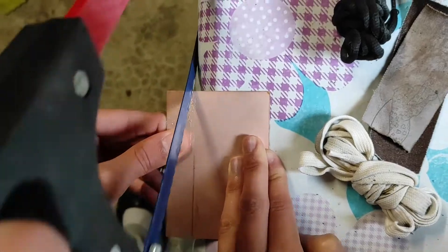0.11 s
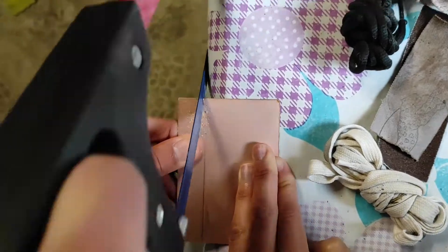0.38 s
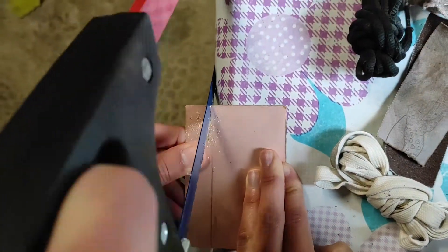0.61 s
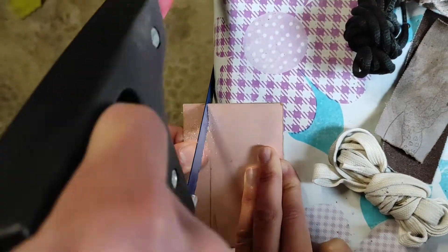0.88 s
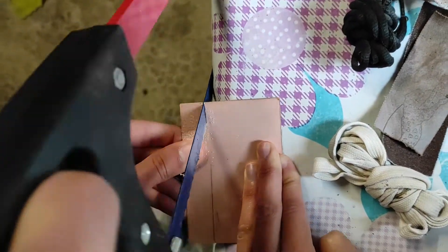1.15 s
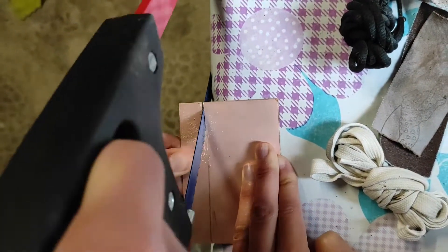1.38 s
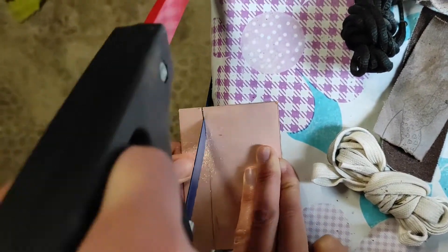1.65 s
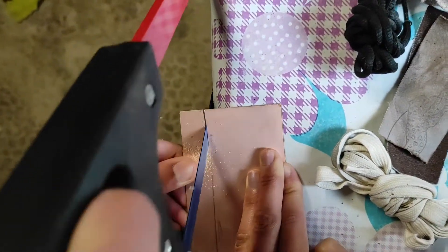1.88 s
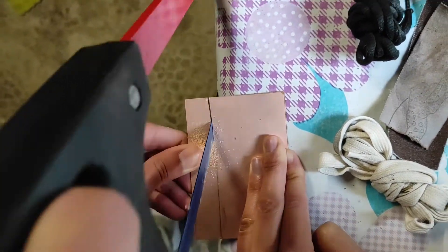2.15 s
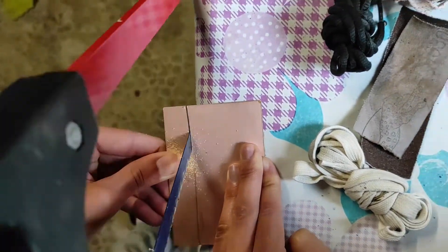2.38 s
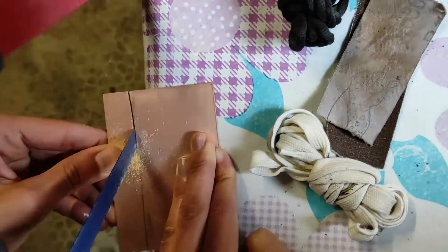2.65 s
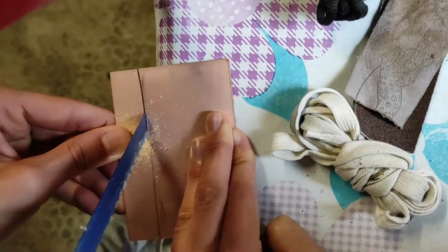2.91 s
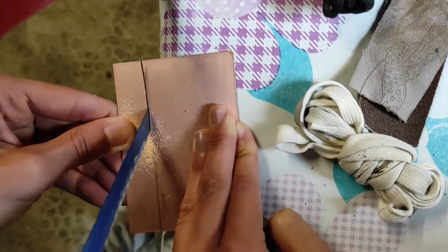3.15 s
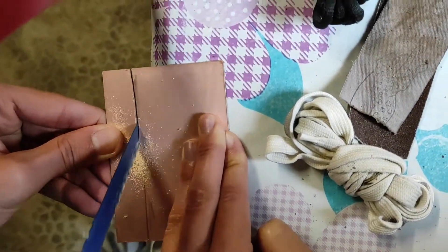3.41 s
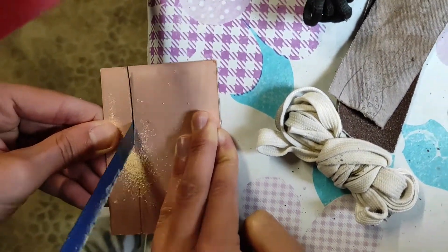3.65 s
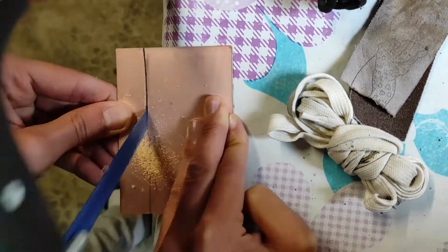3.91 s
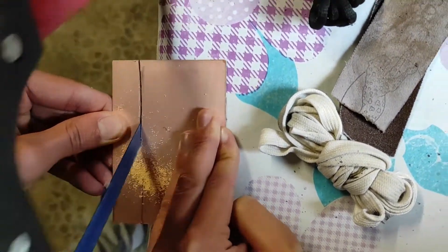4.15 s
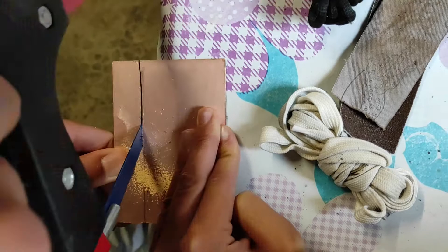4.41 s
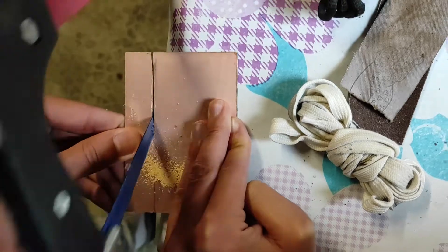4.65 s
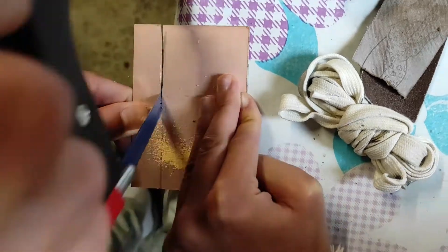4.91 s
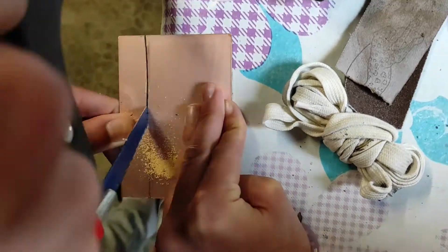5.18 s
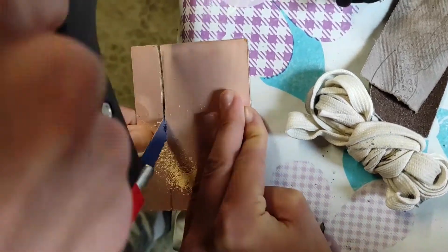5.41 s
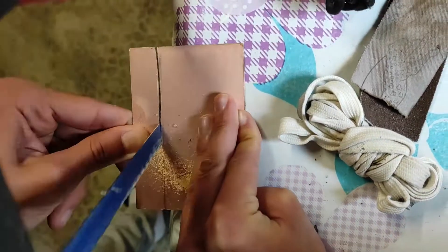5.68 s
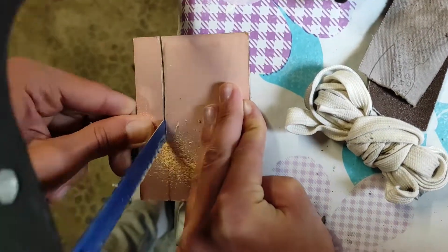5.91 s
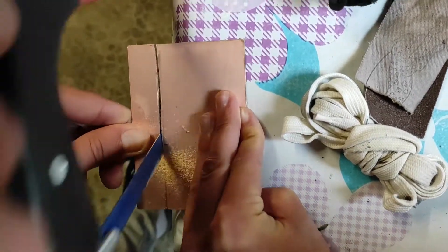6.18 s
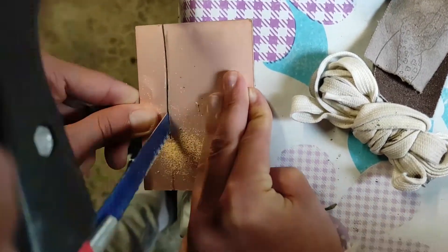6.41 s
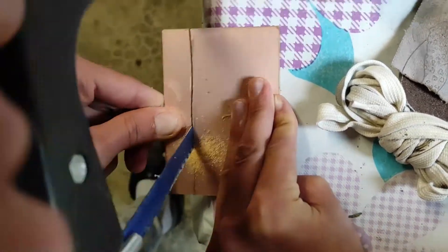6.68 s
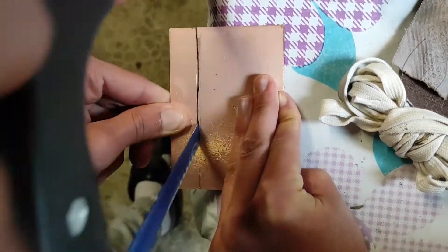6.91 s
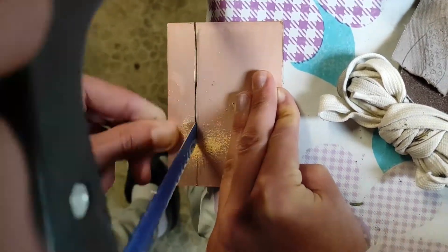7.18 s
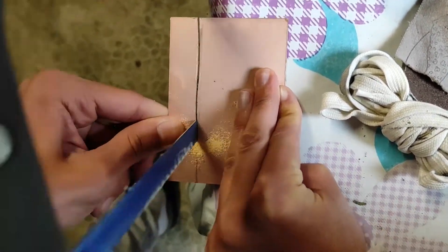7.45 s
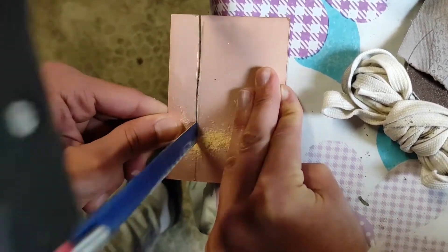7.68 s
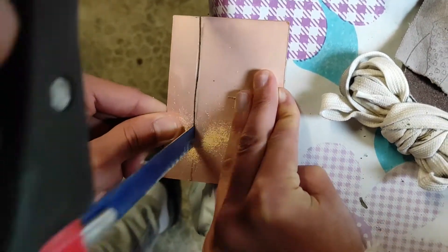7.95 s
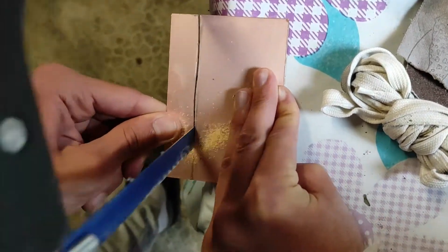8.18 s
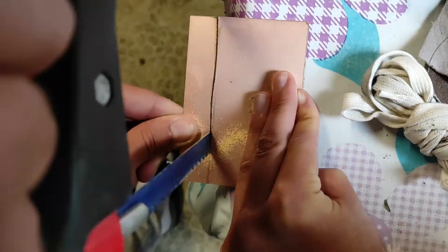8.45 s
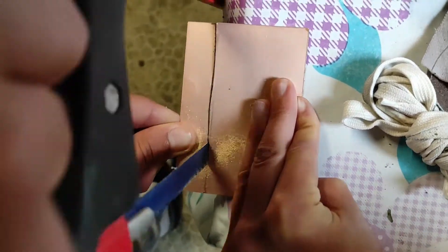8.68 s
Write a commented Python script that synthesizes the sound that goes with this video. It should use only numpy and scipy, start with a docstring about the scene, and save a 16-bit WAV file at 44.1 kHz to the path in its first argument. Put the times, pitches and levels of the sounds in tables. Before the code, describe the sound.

Very close, sped-up sawing with a fine-toothed hacksaw blade along a groove in a thin copper-clad board. Dozens of tiny strokes chirp up and down, ringing the board, with gritty hiss on top and dull thuds from a padded bench. Light at first, it swells brighter midway, breaks into pauses over a faint hum, then returns louder and harder. Dry small room, stereo microphone nearby, stronger on the left.

```python
"""Sped-up strokes of a fine-toothed saw blade, heard as a fast to and fro along a groove in a thin
copper-clad board, close to a two-port microphone. They start lightly: the teeth chirp up and down with the
blade speed and ring board and blade, gritty hiss rides on top, and the padded bench thuds faintly. Past 3 s
the tooth tone and the rings swell for a while. From about 4.3 s longer pauses bare the steady low hum and a
whine that sinks in pitch until 5.4 s. Then come louder, harder strokes up to the end."""
import sys
import numpy as np
from scipy import signal
from scipy.fft import rfft, irfft, next_fast_len
from scipy.io import wavfile
from scipy.ndimage import uniform_filter1d, minimum_filter1d

SR = 44100
rng = np.random.default_rng(int(sys.argv[2]) if len(sys.argv) > 2 else 0)


def elevation(decibels):
    """Turn decibel levels (scalar or array-like) into linear amplitude ratios."""
    levels = np.asarray(decibels, float)
    return 10 ** (levels / 20)


def to_wav(s):
    """Save 16-bit WAV."""
    ch = np.atleast_2d(s).T  # columns
    pcm = np.round(np.clip(ch, -1, 1) * 32767)  # PCM
    wavfile.write(sys.argv[1], SR, pcm.astype(np.int16))


N = 388962  # samples, 8.82 s

# Even runs of strokes, push and pull in turn, a push first: first_s, last_s, strokes (count)
STROKE_RUNS = [(0.031, 0.053, 2), (0.079, 0.205, 6), (0.238, 0.366, 6), (0.396, 0.643, 10),
               (0.675, 0.829, 7), (0.903, 1.11, 8), (1.143, 1.157, 2), (1.178, 1.222, 3), (1.251, 1.283, 2),
               (1.308, 1.366, 3), (1.465, 1.599, 6), (1.628, 1.869, 10), (1.899, 2.044, 6),
               (2.078, 2.106, 2), (2.134, 2.158, 2), (2.19, 2.641, 16), (2.671, 2.807, 6), (2.836, 2.92, 4),
               (2.941, 3.032, 4), (3.058, 3.218, 8), (3.239, 3.313, 4), (3.34, 3.486, 7), (3.644, 3.693, 3),
               (3.721, 4.296, 23), (4.323, 4.343, 2), (4.45, 4.471, 2), (4.64, 4.715, 4), (4.797, 4.882, 4),
               (4.901, 5.061, 7), (5.384, 5.466, 4), (5.49, 5.668, 8), (5.692, 5.902, 10),
               (5.921, 5.949, 2), (5.975, 6.132, 8), (6.153, 6.346, 10), (6.486, 6.699, 10),
               (6.718, 6.734, 2), (6.761, 6.956, 10), (6.973, 7.153, 9), (7.365, 7.471, 6),
               (7.489, 7.839, 16), (7.874, 8.039, 8), (8.063, 8.094, 2), (8.175, 8.243, 4),
               (8.279, 8.373, 4), (8.394, 8.473, 5), (8.498, 8.528, 2), (8.549, 8.572, 2),
               (8.588, 8.687, 6), (8.71, 8.796, 5)]
# How hard each run bears down: teeth_push_db, teeth_pull_db, grit_push_db, grit_pull_db,
# tooth_rate_hz (teeth per second at full speed, before chance)
RUN_FORCES = [(-39, -37.5, -43, -37.5, 1830), (-37.5, -49, -43, -47.5, 1870),
              (-35.5, -44, -40.5, -44.5, 2050), (-33.5, -43.5, -39, -44.5, 2500),
              (-34, -48.5, -40, -47.5, 1870), (-32, -41, -37, -45, 2600), (-36.5, -57, -36.5, -54, 2350),
              (-41, -50, -45, -57, 2560), (-36, -37.5, -35, -42.5, 2350), (-31, -39.5, -37.5, -48, 2970),
              (-35.5, -36.5, -39.5, -38, 2130), (-35, -38.5, -39, -44.5, 2330),
              (-34, -44.5, -40.5, -48, 2220), (-31.5, -35.5, -39, -40.5, 3140),
              (-33.5, -40, -39, -48, 2800), (-32.5, -40, -37, -44.5, 2570),
              (-33.5, -44.5, -41, -51.5, 1890), (-33, -41.5, -40, -44, 2120), (-32, -41, -36.5, -42, 2190),
              (-31, -38, -37.5, -40, 2600), (-34.5, -41.5, -42, -44.5, 1960),
              (-29, -40.5, -40.5, -36, 2730), (-31, -39, -33.5, -35.5, 3580), (-31, -33, -32, -33, 3250),
              (-31, -35.5, -30.5, -41, 3210), (-34.5, -35.5, -40, -38, 2950),
              (-38.5, -40, -34.5, -34, 2770), (-30, -37, -33, -36, 2730), (-29.5, -40.5, -26.5, -28, 2380),
              (-30, -42.5, -24.5, -35.5, 2230), (-28, -36.5, -30, -28.5, 2590), (-26, -35, -31, -33, 3230),
              (-31.5, -45, -38.5, -61, 1810), (-28, -31.5, -31.5, -36.5, 3070),
              (-22.5, -31.5, -36.5, -38.5, 3100), (-28, -36.5, -31.5, -37.5, 2820),
              (-32.5, -38.5, -34, -41, 1700), (-24, -37, -34.5, -32.5, 2610),
              (-25.5, -33.5, -39, -37, 2580), (-32, -36.5, -32, -28, 2730), (-29, -35.5, -30.5, -30, 2450),
              (-29, -33, -30.5, -30.5, 2750), (-29.0, -31.5, -31, -34.5, 2350),
              (-23.5, -32, -32, -32.5, 2800), (-28, -32, -35, -33.5, 3000), (-26, -33.5, -33, -34, 2690),
              (-40, -47, -39.5, -40, 1700), (-29, -32, -33.5, -40, 2400), (-26, -32.5, -34, -33, 2650),
              (-23, -34, -34, -28, 3000)]
# Single saw strokes outside the even runs, weak and strong: middle_s, teeth_db, grit_db,
# tooth_rate_hz (before chance)
LONE_STROKES = [(0.873, -45.5, -44, 1920), (3.591, -46.5, -47, 1510), (3.618, -44.5, -37.5, 1830),
                (4.609, -42, -45.5, 2400), (5.095, -31, -23, 2910), (5.237, -63, -48, 2580),
                (5.306, -40.5, -29, 1300), (5.352, -48, -33, 1750), (6.372, -30, -33, 2600),
                (6.45, -42, -43, 1300), (7.342, -35.5, -33, 1900), (8.141, -34.5, -37, 2000)]
# Strokes that bite hard, each with its own force and speed: middle_s, teeth_db, tooth_rate_hz
HARD_BITES = [(0.4503, -31.5, 2390.0), (0.561, -29, 2820.0), (0.6164, -31, 2280.0), (0.7824, -34.5, 1850.0),
              (0.8996, -32.5, 1920.0), (1.0821, -30, 2260.0), (1.141, -33, 2330.0), (1.2484, -33, 2350.0),
              (1.4901, -32.5, 2800.0), (1.6255, -33, 2540.0), (1.6822, -33, 2300.0), (1.7336, -31, 2390.0),
              (1.788, -30.5, 2260.0), (1.8384, -32, 1980.0), (1.898, -35, 1660.0), (1.9578, -31.2, 2220.0),
              (2.016, -29.5, 2220.0), (2.0799, -31.5, 2780.0), (2.136, -33, 2350.0), (2.1932, -29, 2260.0),
              (2.254, -29, 2840.0), (2.3086, -30, 2000.0), (2.3702, -26.5, 2910.0), (2.4303, -28.5, 2090.0),
              (2.492, -29.5, 3420.0), (2.549, -30, 3270.0), (2.6152, -32.5, 2050.0), (2.6739, -35, 1610.0),
              (2.7268, -29.5, 1850.0), (2.7813, -31, 2240.0), (2.8354, -33.5, 1850.0),
              (3.0026, -35.5, 1980.0), (3.057, -31, 3340.0), (3.1048, -32.5, 2260.0),
              (3.2387, -32.5, 1940.0), (3.2864, -35, 1940.0), (3.4364, -30.5, 2840.0),
              (3.4863, -29.5, 3290.0), (3.642, -33, 3700.0), (3.7002, -32, 3360.0), (3.726, -33, 3400.0),
              (3.7489, -28, 3400.0), (3.7748, -29.5, 3270.0), (3.7989, -33.5, 3490.0), (3.849, -30, 3420.0),
              (3.9313, -30, 3270.0), (3.9548, -30.5, 3360.0), (3.9834, -30.5, 3210.0), (4.008, -29, 3320.0),
              (4.065, -30, 3270.0), (4.092, -28, 3190.0), (4.1416, -26.5, 3230.0), (4.1662, -34.5, 1940.0),
              (4.188, -33, 2760.0), (4.2188, -33.5, 2350.0), (4.2738, -31, 3250.0), (4.2969, -33, 3190.0),
              (4.4507, -36, 1810.0), (4.4728, -38.5, 1920.0), (4.6643, -33.5, 2430.0),
              (4.6922, -31, 3080.0), (4.793, -34.5, 2280.0), (4.8286, -37.5, 2330.0),
              (5.0095, -29.5, 2430.0), (5.035, -34.5, 2480.0), (5.0659, -33.5, 1960.0),
              (5.3852, -33, 1960.0), (5.488, -28, 2330.0), (5.54, -26, 2540.0), (5.5912, -26, 2580.0),
              (5.741, -25.5, 3190.0), (5.7877, -27, 2450.0), (5.9217, -33, 1270.0), (6.0222, -29.5, 2560.0),
              (6.0595, -30, 2430.0), (6.1997, -28, 2240.0), (6.2363, -26.5, 2170.0), (6.2788, -27, 2280.0),
              (6.3254, -24, 3170.0), (6.4854, -27.5, 1890.0), (6.531, -28, 2280.0), (6.5823, -27.5, 3750.0),
              (6.6278, -27, 1920.0), (6.6741, -31.5, 2000.0), (6.718, -27.5, 1850.0),
              (6.8062, -25.5, 2730.0), (6.8257, -28.5, 3080.0), (6.8472, -29, 2170.0),
              (6.8885, -24, 2730.0), (6.9176, -29, 3140.0), (6.9345, -26.5, 2200.0),
              (6.9751, -26.5, 2580.0), (7.0179, -27.5, 2050.0), (7.061, -25, 2840.0), (7.1057, -27, 2690.0),
              (7.1572, -29, 2280.0), (7.409, -25.5, 3210.0), (7.4526, -29.5, 1920.0), (7.4915, -29, 1660.0),
              (7.538, -25.5, 1980.0), (7.5821, -24, 2710.0), (7.632, -26, 1570.0), (7.6758, -31, 1870.0),
              (7.7182, -27.5, 2540.0), (7.7702, -24, 2630.0), (7.8184, -27, 2240.0),
              (7.9253, -29.5, 1980.0), (7.9709, -31.5, 1920.0), (8.0143, -27.5, 2280.0),
              (8.0616, -27, 2330.0), (8.0953, -33, 1550.0), (8.1782, -27, 2130.0), (8.2213, -25, 2480.0),
              (8.2769, -32.5, 2520.0), (8.3483, -31.5, 1980.0), (8.3943, -26, 2500.0),
              (8.4352, -27.7, 1940.0), (8.4712, -28, 1960.0), (8.5911, -33, 1570.0), (8.6657, -25, 2630.0),
              (8.7972, -33, 1640.0)]
# Resonances of board and blade: pitch_hz, width_hz, peak_db
RESONANCES = [(910, 49, 7), (1133, 68, 4), (1330, 45, 3), (1552, 43, 5.5), (1880, 92, 4), (2299, 82, 1),
              (3163, 47, 3.5), (5150, 140, 4.5), (7860, 180, 3), (8820, 250, 1)]
# Dead spots between the resonances: pitch_hz, width_hz, depth_db
DEAD_SPOTS = [(1225, 46, 8), (1438, 44, 9), (1793, 60, 9), (3650, 680, 10.5)]
# Broad colour of the board: pitch_hz, level_db
BOARD_COLOUR = [(300, -33.5), (560, -6), (800, 4), (1200, -2), (2000, 0), (3300, 0), (3900, -2.5),
                (6000, -21)]
# Colour of the grit as the free blade length changes: start_s, board_side_db, blade_ring_db, fizz_db
GRIT_COLOURS = [(0, -5, -6, -1), (3.3, 1, 3.5, 5.5), (3.7, -7.5, 3, 1.5), (4.3, -10.5, -4, -4),
                (4.8, -12, -10.5, -7), (5.599, -18, -12.5, -8), (6.099, -8, -5, 3.5), (6.5, -13, -7.5, -6),
                (7.2, -12, -2, -2), (7.5, -5, -7, -8.5), (8.8, -5.5, -3.5, -3.5)]
# Borders of those three grit bands: pitch_hz
GRIT_BORDERS = (4240, 6040, 9420, 15200)
# The bare tooth tone against the teeth, before its changes from stroke to stroke: start_s, level_db
TOOTH_TONE_LEVEL = [(0, -0.5), (2.2, 2.5), (3.3, 8), (3.7, 2.5), (4.3, -1), (4.8, -7), (6, -0.5),
                    (7.2, 2.5)]
# Rings that come and go as the cut moves along the board: width_hz (of each smoothing), pitch_hz;
# the first has no fixed pitch but glides
BOARD_RINGS = [(380,), (910, 4737), (670, 7265), (1190, 14800)]
# Pitch of the gliding ring: start_s, pitch_hz
RING_GLIDE = [(3.62, 3500), (3.9, 3310), (4.15, 3207)]
# Each ring against the grit, before chance: start_s, then one level_db per ring
RING_LEVELS = [(0, -19, -24, -5, -20), (2.2, -15, -23, -7.5, -25), (3.3, -9, 0, -18, -6),
               (3.7, -2, -23, -10, 1), (4.3, -6.5, -31, -4, -5.5), (4.8, -10.5, -27, -5, -19),
               (5.5, -21, -20, -4, -8), (6.1, -4.5, -25, -3, 3), (6.5, -6, -32, -10, -5.5),
               (7.2, -16, -13, -23, -6), (7.5, -25, -4, -12, -6), (8.8, -7, -3.5, -12, -7)]
# Colour of the padded bench: pitch_hz, level_db
BENCH_COLOUR = [(60, -24), (150, -16), (300, 0), (430, -6.5), (600, -21)]
# Small touches of the blade in the pauses: start_s, level_db, pitch_hz
BLADE_TOUCHES = [(1.432, -43, 1880), (3.525, -41, 1573), (4.39, -44.5, 1178), (5.121, -45, 5010),
                 (5.233, -49, 6040), (5.283, -58, 2460), (7.215, -55, 7045), (7.238, -59, 3650),
                 (7.248, -55, 3650), (7.276, -41.5, 1396)]
# Stuck teeth breaking loose as a stroke starts: start_s, level_db (before colouring)
TOOTH_SNAPS = [(1.1767, -18), (2.0707, -14.5), (2.5775, -24), (3.5867, -27), (4.4448, -27), (4.4644, -29),
               (4.6034, -22), (4.6564, -27), (5.234, -21.5), (5.2999, -18.5), (5.3467, -22), (5.3704, -20),
               (8.089, -15.5), (8.1334, -22), (8.2674, -26)]
# Colour of the low hum: pitch_hz, level_db
HUM_COLOUR = [(22, -13), (70, -3.5), (250, -3.5), (400, 2), (480, 2), (580, -31), (740, -15), (1100, -14.5),
              (3580, -21.5), (12000, -25), (16000, -25)]
# The falling whine: start_s, pitch_hz, level_db
WHINE_PATH = [(3.9, 426, -84), (4.401, 398.6, -56.5), (4.75, 386, -64), (5.15, 331, -65), (5.4, 327.4, -76)]
# Microphone ports: pitch_hz, likeness (0-1), left_over_right_db, left_lead_radians
MIC_PORTS = [(50, 0.88, 4.5, 0.9), (302, 1, 10, 0), (1190, 0.85, 10.5, 0.5), (1460, 0.79, 4, -0.04),
             (2140, 0.88, 11.5, -1.2), (3250, 0.78, 7, 1.44), (4920, 0.44, 4, -1.5), (7000, 0.58, 3, -1.5),
             (9200, 0.46, 2, -2.5), (15100, 0.38, 0, -2)]

RISE_S, FALL_S = 0.0095, 0.0155  # longest speed-up and slow-down of a stroke that does not bite
BITE_RISE_S, BITE_FALL_S = 0.008, 0.012  # the same for a stroke that bites
DRAG = 0.13  # the blade keeps scraping faintly while it turns round


def saw():
    """Moves the blade and adds up all it drives: teeth, grit, tooth tone, rings and bench."""
    rows = strokes()
    bites = rows[:, 4] > 0
    rise_s = np.where(bites, BITE_RISE_S, RISE_S)
    fall_s = np.where(bites, BITE_FALL_S, FALL_S)
    speed, stroke = motion(rows[:, 0], rise_s, fall_s)
    # 1 while the blade moves, also across short turns (under 900 samples)
    moving = minimum_filter1d(-minimum_filter1d(-np.sign(speed.round(decimals=3)), size=900), size=901)
    _, teeth_db, grit_db, teeth_hz, bite = rows[stroke].T

    # the teeth catch and let go within a stroke
    catch_db = 1.8 * evened(uniform_filter1d(rng.standard_normal(N), size=160))
    teeth_db = teeth_db + 0.28 * stroke_luck(stroke) + catch_db
    grit_db = grit_db + catch_db

    turns, clicks = tooth_clicks(speed, teeth_hz)
    # noise with heavy tails: a few crumbs are much larger than most
    crumbs = rng.standard_normal((6, N)) * elevation(3.64 * rng.standard_normal(N))
    sound = teeth_on_board(clicks, crumbs[0], teeth_db, speed, moving)
    sound += grit_hiss(turns, clicks, crumbs[1:4], grit_db, speed, moving, stroke)
    sound += tooth_tone(turns, teeth_db, speed, stroke, bite)
    sound += board_rings(crumbs[5], grit_db, speed, moving, stroke)
    return sound + bench_thud(crumbs[4], teeth_db, grit_db, speed)


def strokes():
    """Lists strokes as middle_s, teeth_db, grit_db, tooth_rate_hz, bite (0 or 1); bites take over their strokes."""
    rows = list(LONE_STROKES)
    for (first, last, count), force in zip(STROKE_RUNS, RUN_FORCES):
        push, pull, grit_push, grit_pull, hz = force
        for k, s in enumerate(np.linspace(first, last, count)):
            if k % 2:
                rows.append((s, pull, grit_pull, hz))
            else:
                rows.append((s, push, grit_push, hz))
    rows = np.array([(*row, 0) for row in sorted(rows)])
    rows[:, 3] *= np.exp(0.08 * rng.standard_normal(len(rows)))  # uneven tooth rate
    even = rows[:, 0].copy()
    for s, db, hz in HARD_BITES:
        k = np.argmin(abs(even - s))
        rows[k] = s, db, rows[k, 2], hz, 1
    return rows


def motion(middle, rise_s, fall_s):
    """Blade speed 0-1, a half sine between turning points, and the index of the stroke under way."""
    # a speed-up takes at most 48 % of the gap between two middles
    rise = np.minimum(np.diff(middle, prepend=0) * 0.48, rise_s)
    for s, _ in TOOTH_SNAPS:  # a stuck blade waits for its snap
        k = np.searchsorted(middle, s)
        rise[k] = min(rise[k], middle[k] - s)
    begin = middle - rise
    end = np.minimum(middle + fall_s, np.append(begin[1:], 99))
    knots = np.stack([begin + 1e-5, middle, end], 1).ravel()
    places = (np.arange(len(middle))[:, None] + [0, 0.5, 1]).ravel()
    place = np.interp(np.arange(N) / SR, knots, places)
    return np.abs(np.sin(np.pi * place)), np.minimum(place.astype(int), len(middle) - 1)


def stroke_luck(stroke):
    """One chance value per stroke, held while that stroke lasts."""
    return rng.standard_normal(stroke.max() + 1)[stroke]


def tooth_clicks(speed, hz):
    """One click per tooth, unevenly spaced and sized, faster at mid-stroke; also counts the teeth."""
    wobble = 1 + 0.1 * evened(uniform_filter1d(rng.standard_normal(N), size=24))
    turns = np.cumsum(hz * speed ** 0.65 * wobble) / SR
    size = 1 + 0.3 * rng.standard_normal(int(N / 4))[turns.astype(int)]
    # four harmonics add up to a pulse halfway through each turn
    return turns, size * sum(np.cos(2 * np.pi * k * (turns - 0.5)) for k in range(1, 5))


def teeth_on_board(clicks, crumbs, teeth_db, speed, moving):
    """Clicks, roughness and stray chips strike the board, which rings at its resonances."""
    def board_db(hz):
        return read(BOARD_COLOUR, hz) + modes_db(hz)

    teeth = 0.9 * evened(clicks) + 0.4 * evened(crumbs)
    rasp = teeth * elevation(teeth_db - 3.5) * (speed ** 1.47 + DRAG * moving)
    # stray chips crack off between the teeth, on average 300 a second
    chips = (rng.random(N) < 300 / SR) * rng.standard_normal(N)
    rasp += evened(chips) * elevation(uniform_filter1d(teeth_db, size=1500) - 13) * moving
    return coloured(rasp, board_db) / np.std(coloured(crumbs, board_db))


def grit_hiss(turns, clicks, crumbs, grit_db, speed, moving, stroke):
    """Crumbling grit pulses with the teeth and hisses in three bands."""
    # the grit bursts out fast and thins slowly
    grip = speed ** np.where(np.gradient(speed) > 0, 0.33, 1)
    swell = grip ** 2.6 + 0.91 * DRAG * moving
    pulse = 1 + 1.03 * np.cos(2 * np.pi * turns)  # strongest between the clicks
    s, *band_levels = np.transpose(GRIT_COLOURS)
    sound = np.zeros(N)
    for k, click_share in enumerate([0.5, 0.35, 0.1]):
        def ring_db(hz):
            return band_db(hz, *GRIT_BORDERS[k:k + 2]) + modes_db(hz)

        drive = click_share * evened(clicks) + crumbs[k] * pulse
        db = grit_db + np.interp(np.arange(N) / SR, s, band_levels[k]) + 2 * stroke_luck(stroke)
        sound += coloured(drive * elevation(db) * swell, ring_db) / np.std(coloured(drive, ring_db))
    return sound


def tooth_tone(turns, teeth_db, speed, stroke, bite):
    """The bare tone at the tooth rate, strongest at full speed, lightly coloured by the resonances."""
    tone_db = teeth_db + np.interp(np.arange(N) / SR, *np.transpose(TOOTH_TONE_LEVEL))
    # strokes that do not bite sing less and vary more
    tone_db += (2.54 * stroke_luck(stroke) - 4) * (1.5 - bite)
    tone = elevation(tone_db) * speed ** 2.5 * np.sin(2 * np.pi * turns)
    return coloured(tone, lambda hz: 0.25 * modes_db(hz) + 2)


def board_rings(crumbs, grit_db, speed, moving, stroke):
    """Crumbling noise drives narrow rings whose levels come and go."""
    t = np.arange(N) / SR
    s, *ring_levels = np.transpose(RING_LEVELS)
    sound = np.zeros(N)
    for (width, *fixed_hz), level in zip(BOARD_RINGS, ring_levels):
        hz = fixed_hz[0] if fixed_hz else np.interp(t, *np.transpose(RING_GLIDE))
        db = grit_db + np.interp(t, s, level) + 2.5 * stroke_luck(stroke)
        drive = crumbs * elevation(db) * (speed ** 3.4 + DRAG * moving)
        sound += resonate(drive, hz, width) / np.std(resonate(crumbs, hz, width))
    return sound


def bench_thud(crumbs, teeth_db, grit_db, speed):
    """The padded bench thuds dully along, following a blend of teeth and grit level."""
    def thud_db(hz):
        return read(BENCH_COLOUR, hz)

    db = teeth_db + 0.52 * (grit_db - teeth_db) - 16.5
    return coloured(crumbs * elevation(db) * speed ** 0.2, thud_db) / np.std(coloured(crumbs, thud_db))


def snaps():
    """The stuck teeth break loose with a dry crack that rings the board."""
    out, t = np.zeros(N), np.arange(1500) / SR
    for s, db in TOOTH_SNAPS:
        decay = elevation(db - 60 * t / 0.023)  # falls 60 dB in 23 ms
        out[round(s * SR):][:len(t)] += decay * rng.standard_normal(len(t))
    return coloured(out, lambda hz: 0.5 * modes_db(hz) + band_db(hz, 600, 15900) - 5)


def touches():
    """Short dying scuffs: noise spread round each pitch."""
    out, t = np.zeros(N), np.arange(2000) / SR
    for s, db, hz in BLADE_TOUCHES:
        smooth = max(round(SR / hz / 0.9), 1)
        scuff = evened(uniform_filter1d(rng.standard_normal(len(t)), size=smooth))
        decay = elevation(db - 60 * t / 0.035)  # falls 60 dB in 35 ms
        out[round(s * SR):][:len(t)] += decay * np.sin(2 * np.pi * hz * t) * (1 + 1.23 * scuff)
    return out


def modes_db(hz):
    """Resonance peaks and dead spots of board and blade on a flat base."""
    peaks = 1 + sum(elevation(db) ** 2 / (1 + (2 * (hz - f) / width) ** 2) for f, width, db in RESONANCES)
    dips = sum(db / (1 + (2 * (hz - f) / width) ** 2) for f, width, db in DEAD_SPOTS)
    return 10 * np.log10(peaks) - dips


def resonate(x, hz, width):
    """A steep resonance that may glide: shift down, smooth twice, shift back."""
    turn = np.exp(2j * np.pi * np.cumsum(hz * np.ones(N)) / SR)
    r = np.exp(-np.pi * width / SR)
    return 2 * (turn * signal.lfilter([(1 - r) ** 2], [1, -2 * r, r * r], x / turn)).real


def band_db(hz, lo_hz, hi_hz):
    """Steep band-pass."""
    return -10 * np.log10((1 + (lo_hz / (hz + 1)) ** 16) * (1 + (hz / hi_hz) ** 16))


def coloured(x, db_of_hz):
    """Filters without looking ahead, with the given dB spectrum (minimum phase)."""
    hz = np.abs(np.fft.fftfreq(8192, 1 / SR))
    log_gain = np.log(elevation(np.maximum(db_of_hz(hz), -100)))
    taps = np.fft.ifft(np.exp(np.conj(signal.hilbert(log_gain)))).real[:4096]
    return signal.oaconvolve(x, taps)[:N]


def read(points, hz, column=1):
    """Reads a table on a log-frequency axis."""
    rows = np.array(points)
    return np.interp(np.log(hz + 1), np.log(rows[:, 0] + 1), rows[:, column])


def evened(x):
    """Scales to an rms (average strength) of 1."""
    return x / np.sqrt(np.mean(x ** 2) + 1e-20)


def room(x):
    """Short dense tail from bench and walls: sparse echoes of random sign, falling 60 dB in 62 ms."""
    at = np.arange(40, 6000, 12)
    at = at + rng.integers(0, 12, len(at))
    taps = np.zeros(6100)
    taps[at] = rng.choice([-1., 1.], len(at)) * elevation(-60 * at / SR / 0.062)
    return elevation(-15.5) * signal.oaconvolve(x, taps / np.linalg.norm(taps))[:N]


def low_hum():
    """Two separate strands of steady noise, coloured into a low hum."""
    strands = rng.standard_normal((2, N))
    return [elevation(-60) * evened(coloured(noise, lambda hz: read(HUM_COLOUR, hz))) for noise in strands]


def falling_whine():
    """A faint sine that sinks in pitch; slow noise wavers both pitch and level."""
    s, *columns = np.transpose(WHINE_PATH)
    hz, db = (np.interp(np.arange(N) / SR, s, c) for c in columns)
    waver = evened(uniform_filter1d(rng.standard_normal(N), size=1500))
    phase = 2 * np.pi * np.cumsum(hz + 4.42 * waver) / SR
    return np.sqrt(2) * elevation(db + 1.1 * waver) * np.sin(phase)


def jumbled(x):
    """The same short-time spectra with random phases: what reaches a port by other paths."""
    z = signal.stft(x, nperseg=256, noverlap=192)[2]
    random_turn = np.exp(2j * np.pi * rng.random(z.shape))
    other = signal.istft(z * random_turn, nperseg=256, noverlap=192)[1][:N]
    return evened(other) * x.std()


def two_ports(near, other):
    """Left hears the near sound; right hears it shifted in phase and mixed with the other paths."""
    size = next_fast_len(N + 1000)
    hz = np.fft.rfftfreq(size, 1 / SR)
    near, other = rfft(near, size), rfft(other, size)
    same, lean_db, lead = (read(MIC_PORTS, hz, column=k) for k in (1, 2, 3))
    same = np.clip(same, 0, 1)
    right = same * np.exp(-1j * lead) * near + np.sqrt(1 - same ** 2) * other
    left_share = 2 / (1 + elevation(-lean_db))
    return np.array([irfft(near * left_share, size), irfft(right * (2 - left_share), size)])[:, :N]


def scene():
    """Saw, room and background as they reach the two ports."""
    blade = saw() + touches() + snaps()
    blade = blade + room(blade)
    hum = low_hum()
    return two_ports(blade + hum[0] + falling_whine(), jumbled(blade) + hum[1])


def roll_off(x):
    """The treble ends steeply here."""
    return signal.sosfilt(signal.butter(12, 16820, fs=SR, output="sos"), x)


def record(dry):
    """Removes the treble above about 15.8 kHz and finishes the mix."""
    low_pass = signal.firwin(1535, 15800, window=("kaiser", 9), fs=SR)
    limited = signal.oaconvolve(dry, low_pass[None], "same")
    return roll_off(limited)


dry = scene()
out = record(dry)
to_wav(out)
```